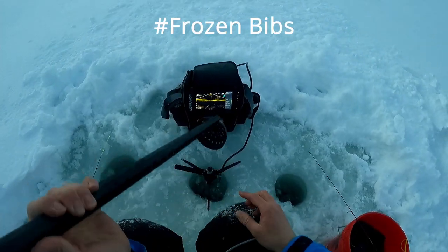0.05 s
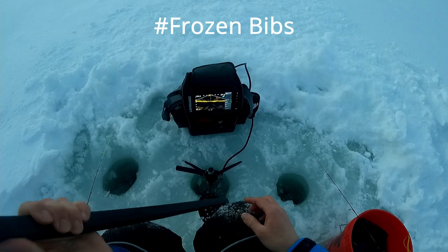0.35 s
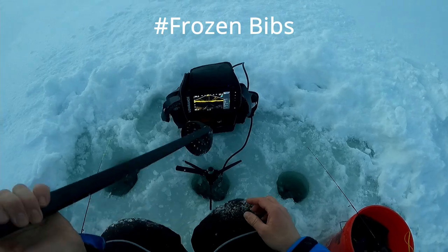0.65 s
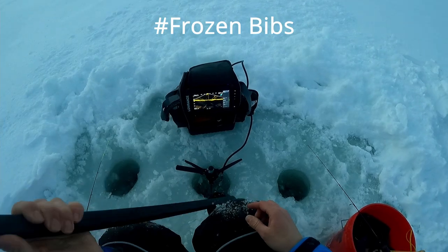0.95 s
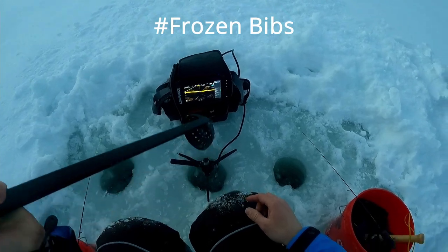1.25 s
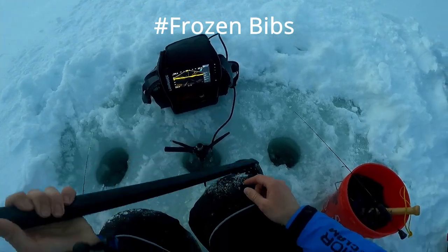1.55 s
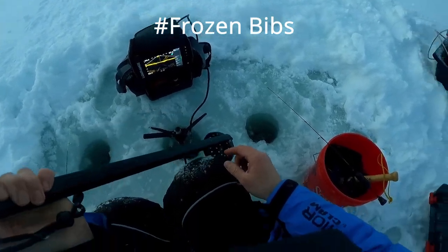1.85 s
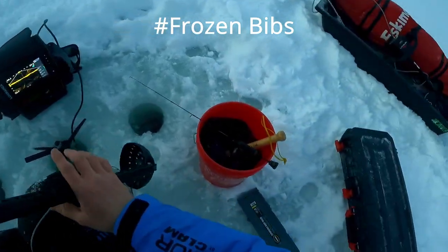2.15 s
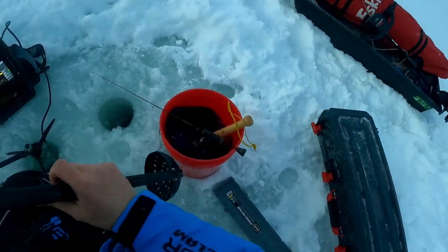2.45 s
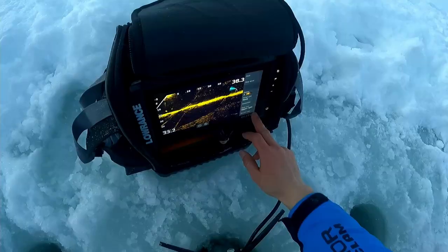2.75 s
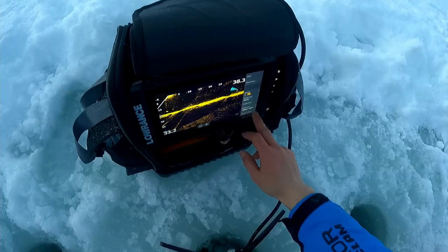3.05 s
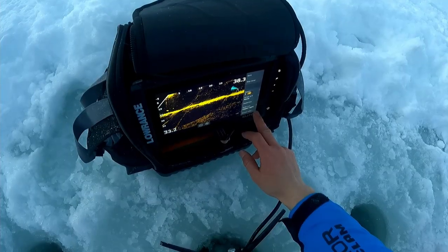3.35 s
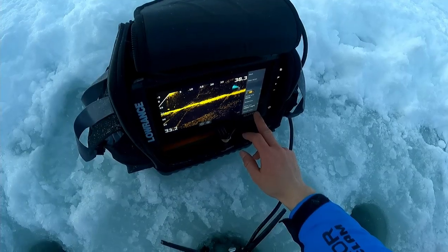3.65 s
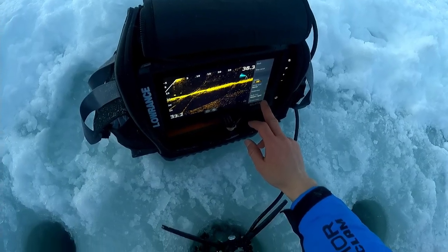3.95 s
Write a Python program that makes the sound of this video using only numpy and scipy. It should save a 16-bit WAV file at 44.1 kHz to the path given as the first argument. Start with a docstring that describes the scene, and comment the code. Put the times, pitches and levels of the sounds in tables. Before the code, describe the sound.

A plastic ice scoop knocks on the frozen knee of padded overalls at about 0.3, 0.9 and 1.6 seconds, each a thud with an icy crunch and falling crumbs. It clicks a few times around 1.8 seconds. From 2 seconds a sleeve rubs and bumps the body-worn microphone. Wind rumbles throughout. At 2.7 seconds everything suddenly turns muffled, leaving rumble, soft bumps and faint hiss until 4 seconds.

```python
"""A long plastic ice scoop knocks three times on the frozen knee of a pair of overalls. Each blow thuds on the
padding, crunches the icy cloth and scrapes off, and crumbs of ice fall. The scoop clicks a few times, then a
sleeve rubs over a body-worn camera and bumps it. Wind from the open lake rumbles on the microphone. Near the
end the scene suddenly changes: only a muffled rumble, soft bumps and a faint background hiss remain."""
import sys
import numpy as np
from scipy import signal
from scipy.fft import rfft, irfft, next_fast_len
from scipy.io import wavfile
from scipy.ndimage import uniform_filter1d, minimum_filter1d, map_coordinates

SR = 44100
rng = np.random.default_rng(int(sys.argv[2]) if len(sys.argv) > 2 else 0)


def wrap_up_sound(samples):
    """Save the sound to the file named by the first command line argument, as 16-bit audio."""
    columns = np.atleast_2d(samples).T
    # keep every value between -1 and 1, then stretch to whole-number steps
    tamed = np.clip(columns, -1, 1)
    steps = np.round(tamed * 32767).astype(np.int16)
    wavfile.write(sys.argv[1], SR, steps)


N = 176400  # 4 seconds


def amp(db):
    """Turn decibels into a number to multiply by."""
    return 10 ** (np.asarray(db) / 20)


def unit(x):
    """Scale a sound to an average (rms) size of 1."""
    return x / np.sqrt(np.mean(x ** 2) + 1e-20)


def along(points, hz):
    """Read between the rows of a (frequency_hz, value) table."""
    frequencies, values = np.transpose(points)
    return np.interp(np.log(hz + 1), np.log(frequencies), values)


def level(rows):
    """Join (time_s, level_db) rows into a volume curve."""
    return amp(np.interp(np.arange(N) / SR, *np.transpose(rows)))


def filtered(x, response):
    """Multiply each frequency in a sound by response(hz)."""
    n = x.shape[-1]
    size = next_fast_len(n + SR // 4)
    return irfft(rfft(x, size) * response(np.fft.rfftfreq(size, 1 / SR)), size)[..., :n]


def coloured(x, db_of, size=4096):
    """Change the tone by db_of(hz), letting nothing sound before a hit begins."""
    cepstrum = irfft(np.log(amp(db_of(np.fft.rfftfreq(size, 1 / SR)))))
    cepstrum[1:size // 2] *= 2  # move the filter's early half to after the hit
    cepstrum[size // 2 + 1:] = 0
    return signal.fftconvolve(x, irfft(np.exp(rfft(cepstrum))))[:len(x)]


def fade(t, fade_s):
    """Die away by 60 dB every fade_s seconds."""
    return amp(-60 * t / fade_s)


def treble(hz):
    """Rise from 0 for low sounds to 1 for high ones."""
    return hz ** 2 / (hz ** 2 + 2500 ** 2)


def ringing(tones, hz):
    """How strongly an object with (pitch_hz, width_hz, gain_db) tones answers each frequency."""
    return sum(amp(db) * 1j * hz * width / (pitch ** 2 - hz ** 2 + 1j * hz * width)
               for pitch, width, db in tones)


def add(track, start_s, x):
    """Mix a sound into the track at start_s."""
    i = max(round(start_s * SR), 0)
    track[i:i + len(x)] += x[:N - i]


def placed(x, pan):
    """Share a sound between the ears using (frequency_hz, left_over_right_db) rows."""
    return filtered(x, lambda hz: 2 / (1 + amp(np.outer([-1, 1], along(pan, hz)))))


def grains(n, per_s, spread_db):
    """Tiny ticks of uneven size at random moments."""
    ticks = (rng.random(n) < per_s / SR) * rng.choice([-1, 1], n)
    return unit(ticks * amp(spread_db * np.clip(rng.standard_normal(n), -2, 2)))


def rush(tone, pan, width_db):
    """Steady noise, nearly alike in both ears."""
    middle, side = unit(filtered(rng.standard_normal((2, N)), lambda hz: amp(along(tone, hz))))
    return placed(middle + np.outer([1, -1], amp(width_db) * side), pan)


def burst(fade_s, db_of):
    """A quickly dying puff of noise with a peak of 1."""
    t = np.arange(SR // 6) / SR
    puff = coloured(rng.standard_normal(len(t)) * fade(t, fade_s), db_of)
    return puff / abs(puff).max()


def taps(rows, tone, fade_s):
    """One puff of noise for each (start_s, level_db) row."""
    out = np.zeros(N)
    for start_s, db in rows:
        add(out, start_s, amp(db) * burst(fade_s, lambda hz: along(tone, hz)))
    return out


# The gusts: time_s, level_db
WIND_LEVELS = [(0, -29.5), (.3, -33.5), (.41, -33), (.46, -25.5), (.6, -36), (.75, -38), (.98, -30.5),
               (1.2, -33.5), (1.68, -32), (1.73, -25), (1.85, -26.5), (1.95, -28), (2.22, -31),
               (2.46, -23.5), (2.77, -26), (2.83, -20), (3.0, -25), (3.32, -28.5), (3.55, -22), (3.83, -33),
               (4.0, -22.5)]
# The wind's deep tone: frequency_hz, gain_db
WIND_TONE = [(15, -4), (28, 5.5), (48, -5), (80, -9), (130, -21), (220, -28.5), (400, -42), (1000, -71),
             (3000, -110)]
# The rumble leans right: frequency_hz, left_over_right_db
RUMBLE_PAN = [(40, -4.5), (300, -6.5)]
def wind():
    """Gusts push on the microphone openings and rumble."""
    return level(WIND_LEVELS) * rush(WIND_TONE, RUMBLE_PAN, width_db=-13)


# The rustle swells and sinks: time_s, level_db
RUSTLE_LEVELS = [(0, -49), (.2, -51.5), (.28, -55), (.45, -48.5), (.54, -48.5), (.63, -54.5), (.85, -51.5),
                 (1.1, -52.5), (1.18, -54.5), (1.35, -54), (1.44, -61), (1.53, -51.5), (1.66, -48.5),
                 (1.8, -58), (2.1, -47.5), (2.19, -60), (2.33, -56.5), (2.6, -63), (2.72, -62.5)]
# Its tone: frequency_hz, gain_db
RUSTLE_TONE = [(100, 13.5), (250, 9), (600, 3), (1300, -1), (2000, -3.5), (3000, -4.5), (4500, -3),
               (7500, -6), (9500, -15.5), (12500, -20), (14500, -37)]
# Where the clothing is heard: frequency_hz, left_over_right_db
CLOTHING_PAN = [(200, -1), (1200, 0), (7000, 2)]
def rustle(flutter_db=2.14, flutters_per_s=40):
    """Clothing and snow rub softly, making a hiss whose level flutters."""
    flutter = map_coordinates(rng.standard_normal(2000), [np.arange(N) * flutters_per_s / SR], mode="wrap")
    hiss = rush(RUSTLE_TONE, CLOTHING_PAN, width_db=-9.5)
    return level(RUSTLE_LEVELS) * amp(flutter_db * flutter) * hiss


# Falling ice crumbs: start_s, level_db
CRUMB_FALLS = [(.205, -39.5), (.214, -38.5), (.4485, -38.5), (.498, -36.5), (.521, -37.5), (.562, -40),
               (.705, -42.5), (.8105, -38), (.838, -38.5), (1.218, -45), (1.313, -41.5), (1.404, -42.5),
               (1.451, -46), (1.7065, -44.5), (1.7545, -35), (1.861, -41.5)]
# Their bright tone: frequency_hz, gain_db
CRUMB_TONE = [(1000, -16), (4000, -4.5), (7500, 1.5), (12000, -14.5), (16000, -14)]
def crumbs(rise_s=0.0011):
    """Each flake of ice comes away with a tiny crackle."""
    out, t = np.zeros(N), np.arange(SR // 20) / SR
    for start_s, db in CRUMB_FALLS:
        noise = rng.standard_normal(len(t)) * np.minimum(t / rise_s, 1) * fade(t, fade_s=0.016)
        crackle = coloured(noise, lambda hz: along(CRUMB_TONE, hz))
        add(out, start_s, amp(db) * crackle / abs(crackle).max())
    return out


# The scoop crushes and scrapes the icy cloth:
# start_s, rise_s, hold_s, fade_s, level_db, bass_db, treble_db, hollow_pitch_hz, hollow_db
CRUNCH_STROKES = [(0.3314, 0.0024, 0.0128, 0.11, -19, -2.5, -1, 990, -5),
                  (0.359, .006, 0.0022, 0.032, -27, -5.5, 9.5, 1100, -8),
                  (0.403, .002, .003, 0.041, -38.5, -20.5, 2, 900, -13.5),
                  (0.415, 0.0051, 0.0058, 0.041, -27, -8, -12.5, 760, 8),
                  (0.9224, 0.0013, 0.0012, 0.068, -21, 3, 7, 410, 7.5),
                  (.935, .006, .005, 0.062, -19.5, 9, -2, 410, -9),
                  (0.948, .003, .009, 0.11, -29.5, -11, 8, 930, -2),
                  (0.98, .004, .027, 0.046, -28, -9, -4, 1820, 0),
                  (1.031, 0.0064, 0.046, 0.077, -41, -6.5, -2.5, 950, 4),
                  (1.6067, .001, 0.0027, 0.021, -20.5, 11, 6.5, 340, 2.5),
                  (1.612, .008, .010, .05, -18.5, 2, 3, 779, 14)]
# The tone of the crunch: frequency_hz, gain_db
CRUNCH_TONE = [(50, -8), (150, -5), (350, -2), (550, -2.5), (900, -2.5), (1300, -8.5), (2000, -7),
               (2800, -11), (3900, -9), (5500, -15), (7700, -20), (10000, -30), (12500, -34),
               (15500, -52.5)]
# The scoop's own tones: pitch_hz, width_hz, relative_gain_db
SCOOP_RING = [(367, 82, 2.5), (720, 55, -4.5), (889, 47, -2), (1100, 25, -4), (1640, 25, -1.5),
              (1768, 20, 1), (2480, 30, -3.5), (3260, 89, -11), (3753, 53.9, -2.5), (4650, 40.6, 2)]
def crunches(scoop_db=-3.5, hollow_width_hz=49):
    """Many tiny breaks in the frozen cloth ring the scoop and the hollow pressed into the knee."""
    out, t = np.zeros(N), np.arange(SR // 4) / SR
    scoop = [(hz, width_hz, db + scoop_db) for hz, width_hz, db in SCOOP_RING]
    for start_s, rise_s, hold_s, fade_s, db, bass_db, treble_db, hollow_hz, hollow_db in CRUNCH_STROKES:
        rings = scoop + [(hollow_hz, hollow_width_hz, hollow_db)]
        tone = lambda hz: along(CRUNCH_TONE, hz) + treble_db * treble(hz) + bass_db / (1 + (hz / 500) ** 2)
        shaped = lambda x: filtered(coloured(x, tone), lambda hz: 1 + ringing(rings, hz))
        breaks = grains(len(t), per_s=7000, spread_db=3)
        pressure = np.minimum(t / rise_s, 1) * fade(np.maximum(t - rise_s - hold_s, 0), fade_s)
        add(out, start_s, amp(db) * shaped(breaks * pressure) / shaped(breaks).std())
    return out


# Blows on the knee: start_s, level_db, pitch_hz
KNEE_THUDS = [(0.3322, -18.5, 125), (0.3433, -20.5, 310), (0.9257, -18.5, 185), (0.9398, -13, 194),
              (1.6082, -11.5, 185), (1.617, -13, 340)]
def thuds():
    """The padded knee gives way with a low note that dies almost at once."""
    out, t = np.zeros(N), np.arange(SR // 6) / SR
    for start_s, db, hz in KNEE_THUDS:
        add(out, start_s, -amp(db) * np.sin(2 * np.pi * hz * t) * fade(t, fade_s=0.05))
    return out


# Single cracks in the ice crust: start_s, level_db, centre_hz
CRUST_CRACKS = [(0.348, -10.5, 3815), (0.3514, -19, 1500), (0.9259, -10.5, 2580), (0.941, -10.5, 1263),
                (0.9456, -8, 3237), (.9963, -14.5, 1856), (1.6125, -14, 7470), (1.6357, -10, 4000),
                (1.6416, -15, 7470), (2.1564, -29, 3320), (2.478, -35, 2033)]
def cracks(width_octaves=0.53):
    """Larger pieces of crust snap, each a puff of noise around its own pitch."""
    out = np.zeros(N)
    for start_s, db, centre_hz in CRUST_CRACKS:
        distance = lambda hz: np.log2((hz + 1) / centre_hz) / width_octaves
        band = lambda hz: -10 * np.log10(1 + distance(hz) ** 4) - 12 * (hz / 13000) ** 2
        add(out, start_s, amp(db) * burst(fade_s=0.0026, db_of=band))
    return out


# Hard clicks of the scoop: start_s, level_db, treble_db, pitch_factor
SCOOP_CLICKS = [(1.1265, -33, 11.5, .83), (1.6928, -25, 4.5, 1), (1.7472, -6, -6.5, 0.92),
                (1.8130, -19, 10, .96), (1.8462, -23.5, 8.5, 1.02)]
# The notes of the plastic: pitch_hz, relative_level_db, fade_s
CLICK_NOTES = [(1249, -13.5, .014), (1970, -11, .018), (2352, -2.5, 0.02), (3385, -6, .011),
               (3850, -2, .011), (5300, 3.5, .009), (6500, -9, .006), (7600, -8.5, .006)]
# The tone of the snap: frequency_hz, gain_db
SNAP_TONE = [(300, -32.5), (1500, -1), (5500, 4), (8500, -16.5), (11500, -23.5), (16000, -33)]
def clicks(ring_db=-13.5, snap_db=-1.5, echo_db=-9, echo_delay_s=0.002):
    """The plastic snaps and rings briefly, and the rough ice sends back a blurred echo."""
    out, t = np.zeros(N), np.arange(SR // 6) / SR
    for start_s, db, treble_db, pitch_factor in SCOOP_CLICKS:
        ring = np.zeros(len(t))
        for hz, note_db, fade_s in CLICK_NOTES:
            # Each click lands on another spot, so its notes vary a little.
            strength = rng.choice([-1, 1]) * amp(note_db + treble_db * treble(hz) + 2 * rng.standard_normal())
            pitch_hz = hz * pitch_factor * (1 + 0.03 * rng.standard_normal())
            ring += strength * fade(t, fade_s) * np.sin(2 * np.pi * pitch_hz * t)
        snap = burst(fade_s=0.005, db_of=lambda hz: along(SNAP_TONE, hz))
        click = amp(db) * (amp(ring_db) * ring + amp(snap_db) * snap)
        blur = rng.standard_normal(len(t)) * fade(t, fade_s=0.028)
        echo = signal.fftconvolve(click, blur / np.linalg.norm(blur))
        add(out, start_s, click)
        add(out, start_s + echo_delay_s, amp(echo_db) * echo)
    return out


# The swish of the arm: time_s, level_db
ARM_LEVELS = [(1.55, -67), (1.75, -51.5), (1.88, -50.5), (1.97, -48), (2.1, -44.5), (2.4, -52.5),
              (2.72, -58)]
# Its tone: frequency_hz, gain_db
ARM_TONE = [(100, 7.5), (400, -1), (800, -2), (1400, 0.5), (2400, -10), (4000, -21.5), (9000, -42)]
def arm_swish():
    """Cloth swishes softly as the arm reaches out."""
    return level(ARM_LEVELS) * rush(ARM_TONE, CLOTHING_PAN, width_db=-9.5)


# Swings of the camera: start_s, length_s, level_db, pitch_hz
CAMERA_SWINGS = [(2.002, 0.057, -15, 42), (2.067, 0.061, -13, 56), (2.794, 0.044, -19.5, 50),
                 (3.495, 0.089, -20.5, 55)]
def rocking():
    """The camera rocks on its mount as the arm pushes past, making a very low note."""
    out = np.zeros(N)
    for start_s, length_s, db, hz in CAMERA_SWINGS:
        t = np.arange(int(length_s * SR)) / SR
        add(out, start_s, amp(db) * np.sin(np.pi * t / length_s) * np.sin(2 * np.pi * hz * t))
    return out


# How hard the sleeve rubs: time_s, relative_level_db
RUB_LEVELS = [(2.02, -50.5), (2.038, -29), (2.06, -24.5), (2.074, -35.5), (2.114, -29), (2.126, -14.5),
              (2.3, -26.5), (2.31, -17.5), (2.388, -20.5), (2.396, -19), (2.508, -25.5), (2.518, -35.5),
              (2.548, -37), (2.6, -24), (2.622, -31), (2.694, -31.5), (2.7, -30.5), (2.722, -35.5)]
# Its dull tone: frequency_hz, gain_db
RUB_TONE = [(35, -30.5), (60, -2), (136, 2.5), (266, -4), (321, -7), (431, -15.5), (478, -14.5), (697, -22),
            (1550, -32), (3360, -55.5), (7450, -70.5), (9000, -75), (11700, -96), (19800, -120)]
# The camera case's own tones: pitch_hz, width_hz, gain_db
CASE_RING = [(313.6, 130, -4), (463, 79, -11.5)]
def sleeve_rub(direct_db=1, boost_db=1):
    """Cloth sticks and slips on the camera case: a grainy rub with a boxy ring."""
    slips = coloured(grains(N, per_s=600, spread_db=2.5), lambda hz: along(RUB_TONE, hz))
    rub = unit(filtered(slips, lambda hz: amp(direct_db) + ringing(CASE_RING, hz)))
    touching = np.arange(N) / SR > RUB_LEVELS[0][0]
    return amp(boost_db) * rub * level(RUB_LEVELS) * touching


# Bumps on the camera: start_s, level_db
CAMERA_BUMPS = [(2.036, -13.5), (2.124, -7), (2.174, -12.5), (2.885, -26.5), (2.975, -19), (3.089, -19.5),
                (3.375, -28.5), (3.443, -17.5), (3.499, -21), (3.593, -24), (3.892, -26), (3.96, -22.5)]
# Their deep tone: frequency_hz, gain_db
BUMP_TONE = [(30, -6), (90, 7.5), (180, -3), (350, -20.5), (750, -32.5), (1200, -50), (2200, -60.5),
             (8000, -100)]
def bumps():
    """Soft touches thump the camera without making it ring."""
    return taps(CAMERA_BUMPS, BUMP_TONE, fade_s=0.05)


# Folds of the sleeve catching: start_s, level_db
FOLD_CATCHES = [(2.037, -20), (2.121, -10.5), (2.141, -15), (2.242, -22.5), (2.295, -23), (2.380, -18),
                (2.478, -19), (2.568, -40), (2.681, -34.5)]
# Their tone: frequency_hz, gain_db
FOLD_TONE = [(80, -1), (280, -2.5), (500, -4), (900, -16.5), (2200, -27.5), (3500, -44.5), (8000, -70.5)]
def sleeve_folds():
    """Each fold catches on the camera case with a dull tap."""
    return taps(FOLD_CATCHES, FOLD_TONE, fade_s=0.033)


# The tone of the muffled rumble: frequency_hz, gain_db
MUFFLED_TONE = [(15, -9.5), (28, 2), (48, 1), (85, -4), (130, -16.5), (220, -27.5), (400, -46.5),
                (1000, -67), (3000, -110)]
def muffled_wind():
    """After the scene changes, a deep, muffled wind rumbles."""
    return level(WIND_LEVELS) * rush(MUFFLED_TONE, RUMBLE_PAN, width_db=-13)


# A faint, steady background hiss: time_s, relative_level_db
BACKGROUND_LEVELS = [(2.76, -72), (3.494, -67.5), (3.764, -69), (3.774, -67.5), (3.946, -68), (3.97, -67)]
# Its tone: frequency_hz, gain_db
BACKGROUND_TONE = [(300, -4.5), (600, -6.5), (1100, -9), (1500, -19.5), (2300, -22), (3100, -40.5),
                   (6000, -38.5), (14000, -63.5)]
def background_hiss(boost_db=8.5):
    """Quiet noise that stays at nearly the same level."""
    return amp(boost_db) * level(BACKGROUND_LEVELS) * rush(BACKGROUND_TONE, RUMBLE_PAN, width_db=-9.5)


def nearby_echoes(x, level_db=-20.5):
    """Sound bounces off the ice and gear close by, differently for each ear."""
    t = np.arange(SR // 5) / SR
    tail = rng.standard_normal((2, len(t))) * fade(t, fade_s=0.2)
    return amp(level_db) * signal.fftconvolve(x[None], tail / np.linalg.norm(tail[0]), axes=1)[:, :N]


# How much the two microphone openings differ: frequency_hz, difference_db
OPENING_DIFFERENCE = [(150, -26), (1000, -13), (2500, -10), (5000, -11), (9000, -6), (13000, -6)]
def around_case(x, pan):
    """Sound bends round the case, so its treble reaches the two openings differently."""
    t = np.arange(SR // 100) / SR
    path = rng.standard_normal(len(t)) * fade(t, fade_s=0.004)
    bent = signal.fftconvolve(x, path / np.linalg.norm(path))[:N]
    side = filtered(bent, lambda hz: amp(along(OPENING_DIFFERENCE, hz)))
    return placed(x + np.outer([1, -1], side), pan)


# Where the blows, the clicks and crumbs, and the sleeve are heard: frequency_hz, left_over_right_db
BLOW_PAN = [(200, 0.29), (2000, -2.2), (6000, 0.88)]
TICK_PAN = [(500, -2), (2000, 2), (7000, 1.5)]
RUB_PAN = [(60, -7), (200, -9), (400, -13.5), (1200, -18), (2200, -14.5), (5000, -4)]
def scene(muffled_from_s=2.724):
    """Scoop, clothing and wind give way to muffled wind and hiss, while the bumps carry on."""
    blows = crunches() + thuds() + cracks()
    ticks = clicks()
    scoop = around_case(blows, BLOW_PAN) + around_case(ticks, TICK_PAN) + nearby_echoes(blows + ticks)
    clothing = rustle() + arm_swish() + around_case(sleeve_rub() + sleeve_folds(), RUB_PAN)
    clear = uniform_filter1d((np.arange(N) / SR < muffled_from_s) * 1.0, size=200)  # 1, then quickly 0
    mix = clear * (scoop + clothing + wind()) + (1 - clear) * (background_hiss() + muffled_wind())
    handling = placed(bumps() + rocking(), RUMBLE_PAN)
    return mix + handling + around_case(crumbs(), TICK_PAN)


# The microphone dulls the highest sounds: frequency_hz, gain_db
MIC_TONE = [(11000, 0.5), (13000, -3.5), (14500, -9), (15800, -17.5)]
def record(dry, ceiling=0.75, limit_s=0.012, top_hz=15800):
    """Dull the treble, turn loud peaks down and drop everything above top_hz."""
    heard = filtered(dry, lambda hz: amp(along(MIC_TONE, hz)))
    span = round(limit_s * SR)
    needed_gain = ceiling / np.maximum(abs(heard).max(axis=0), ceiling)
    smooth_gain = uniform_filter1d(minimum_filter1d(needed_gain, span), span)
    return filtered(heard * smooth_gain, lambda hz: hz < top_hz)


dry = scene()
out = record(dry)
wrap_up_sound(out)
```